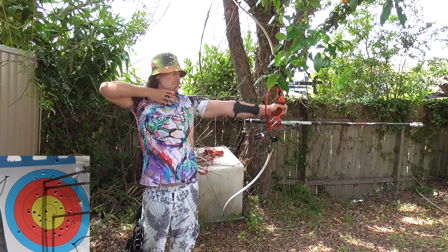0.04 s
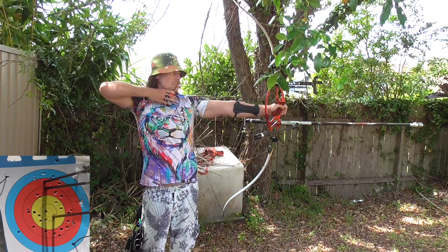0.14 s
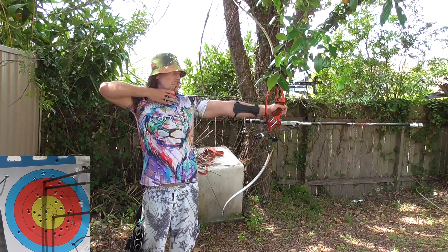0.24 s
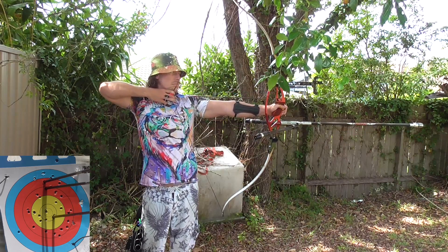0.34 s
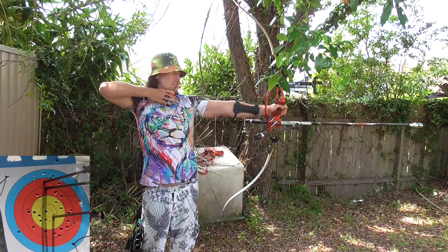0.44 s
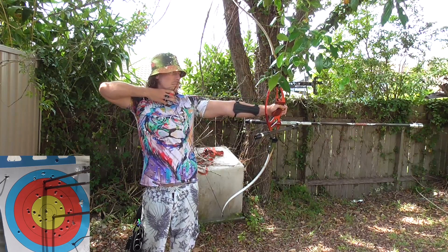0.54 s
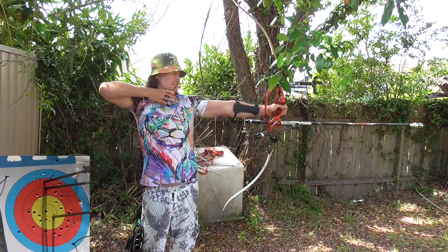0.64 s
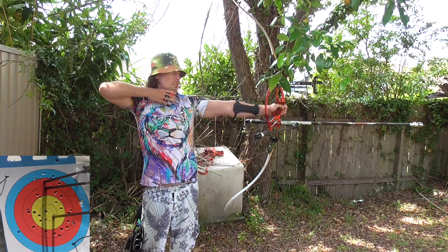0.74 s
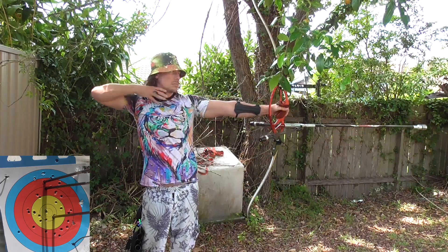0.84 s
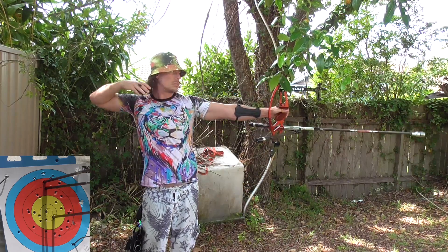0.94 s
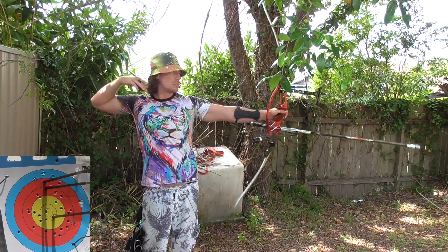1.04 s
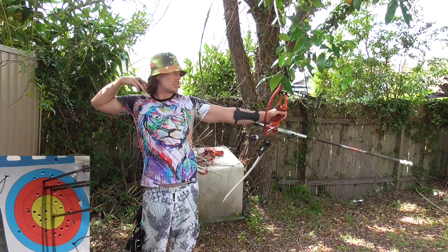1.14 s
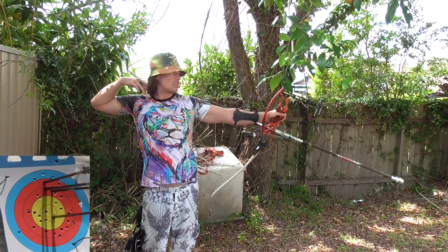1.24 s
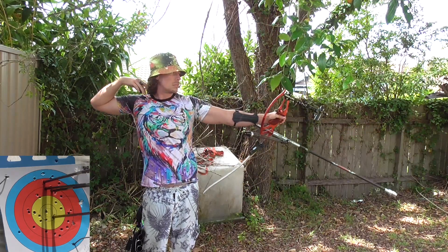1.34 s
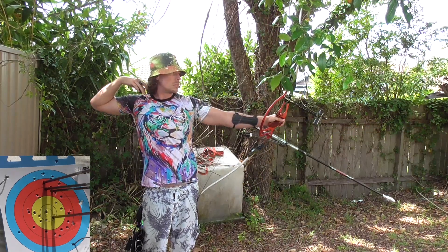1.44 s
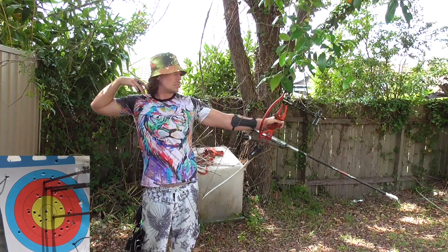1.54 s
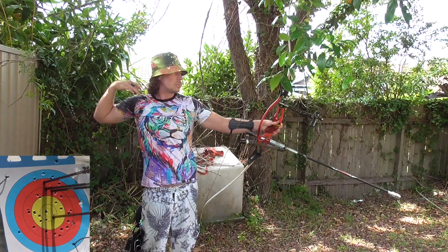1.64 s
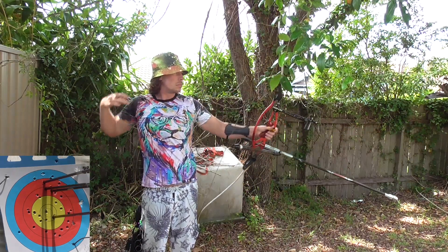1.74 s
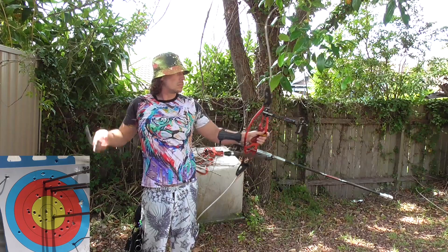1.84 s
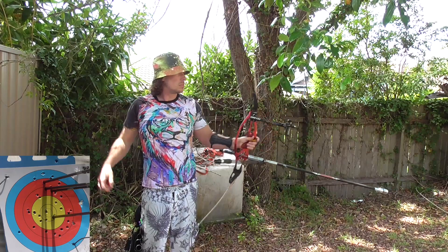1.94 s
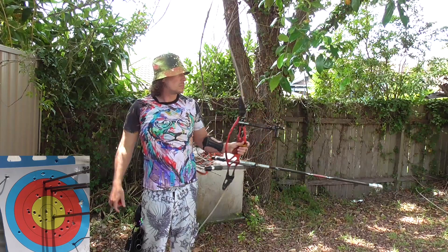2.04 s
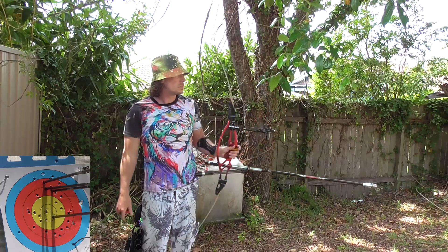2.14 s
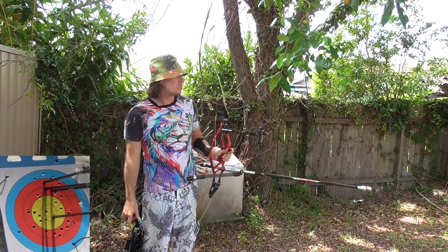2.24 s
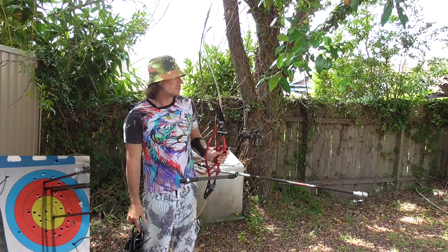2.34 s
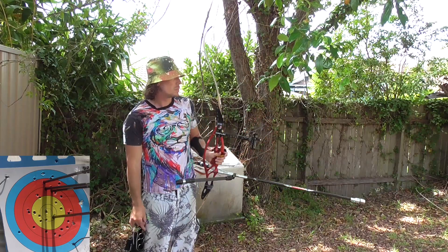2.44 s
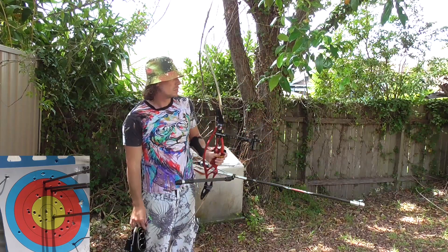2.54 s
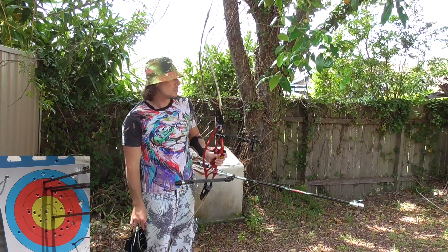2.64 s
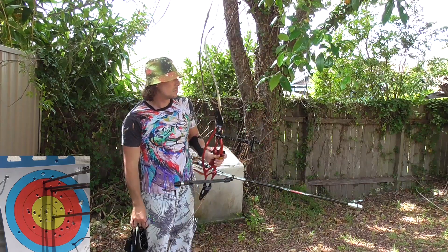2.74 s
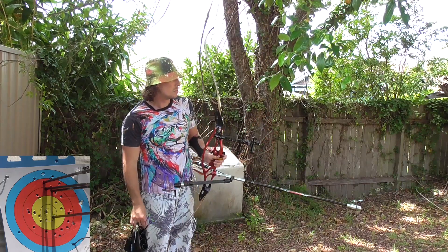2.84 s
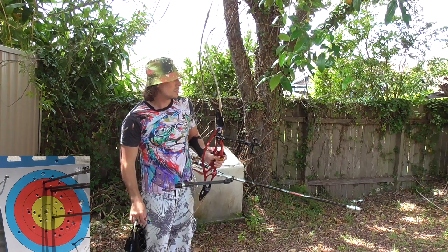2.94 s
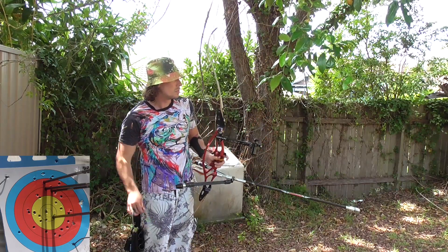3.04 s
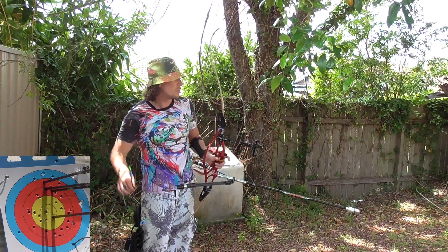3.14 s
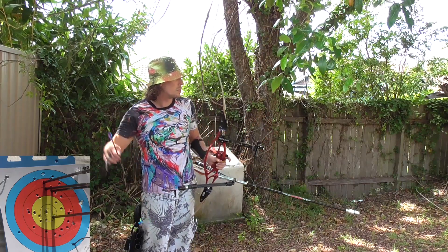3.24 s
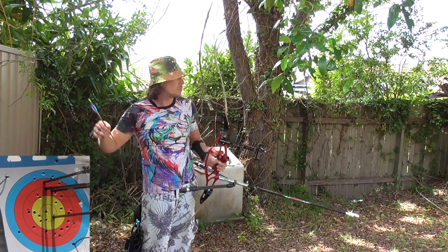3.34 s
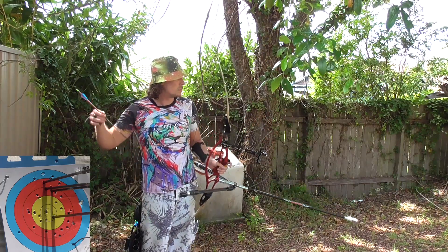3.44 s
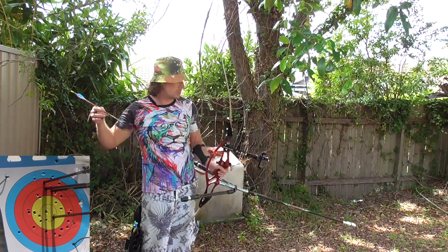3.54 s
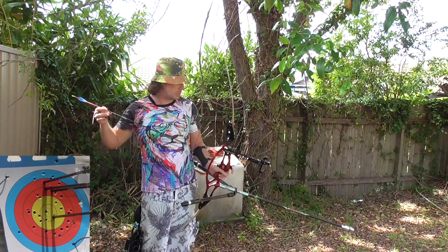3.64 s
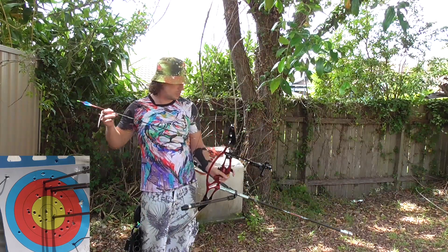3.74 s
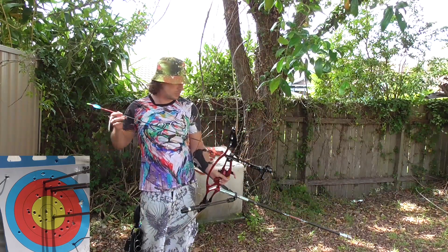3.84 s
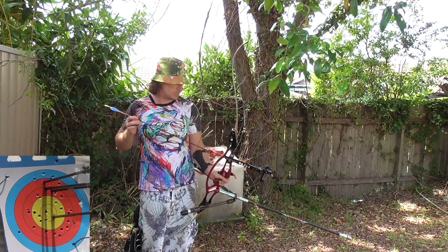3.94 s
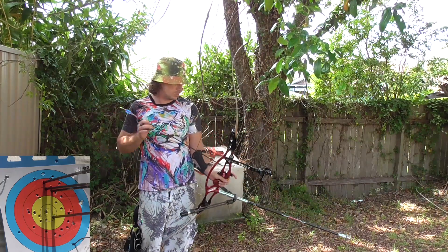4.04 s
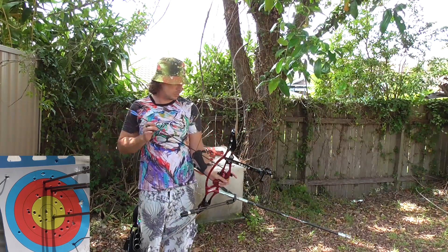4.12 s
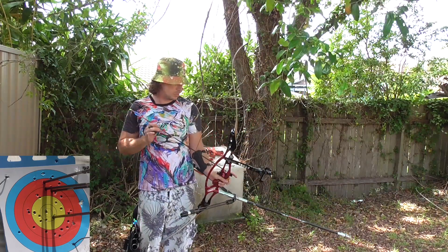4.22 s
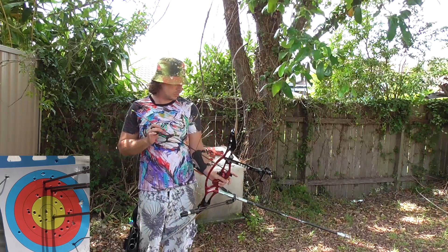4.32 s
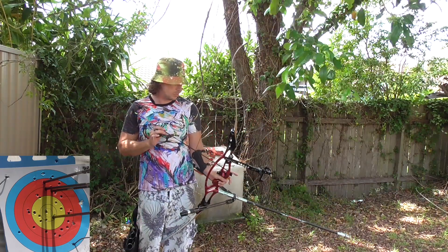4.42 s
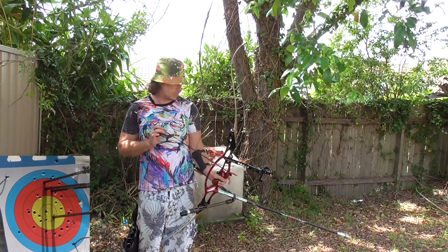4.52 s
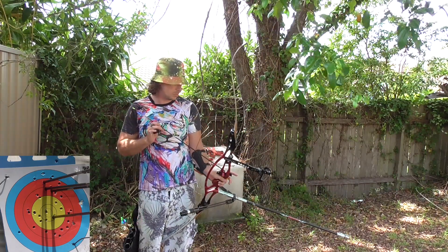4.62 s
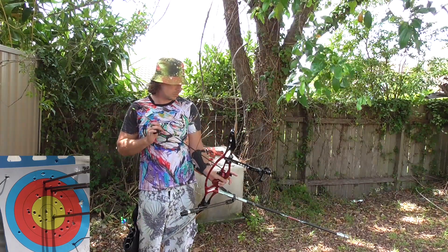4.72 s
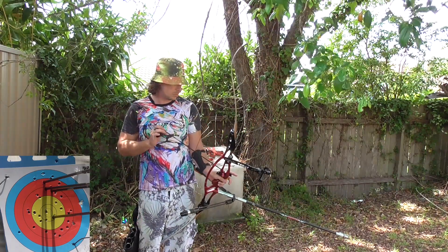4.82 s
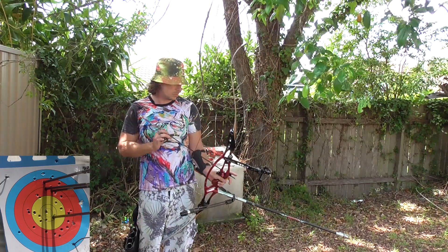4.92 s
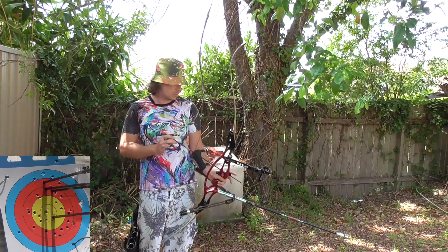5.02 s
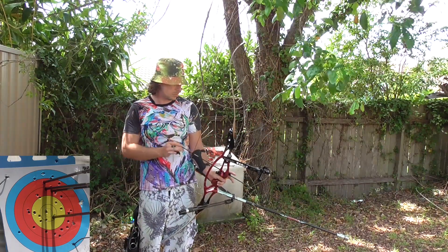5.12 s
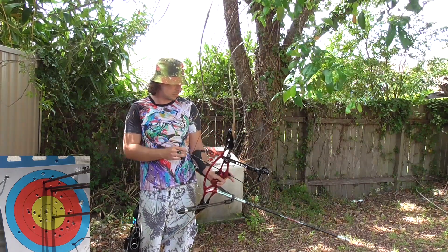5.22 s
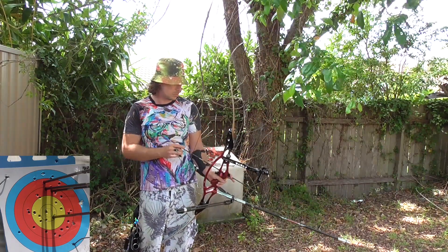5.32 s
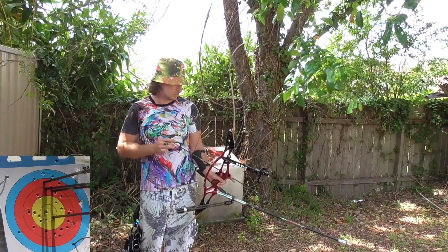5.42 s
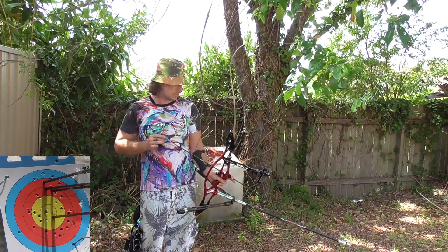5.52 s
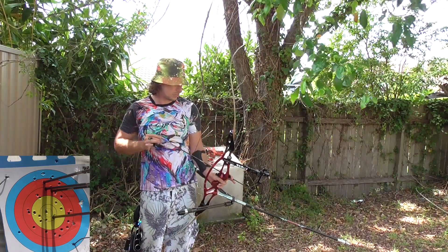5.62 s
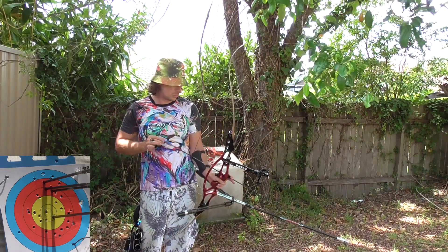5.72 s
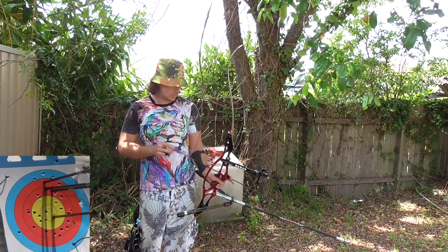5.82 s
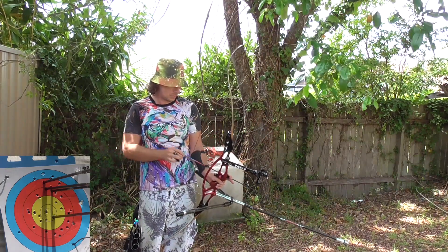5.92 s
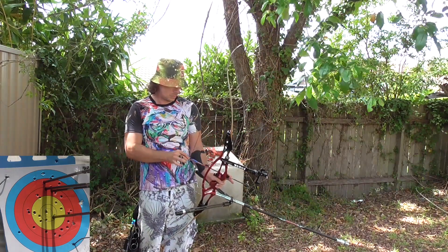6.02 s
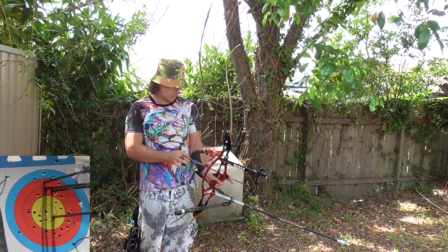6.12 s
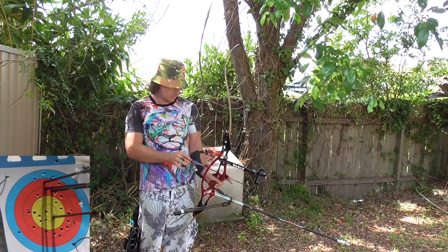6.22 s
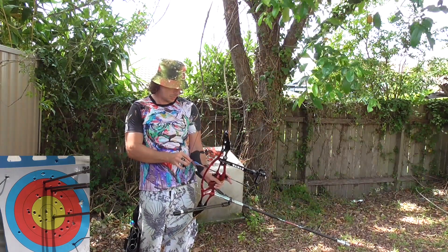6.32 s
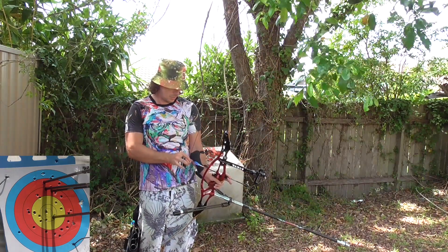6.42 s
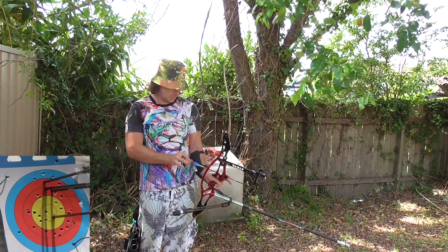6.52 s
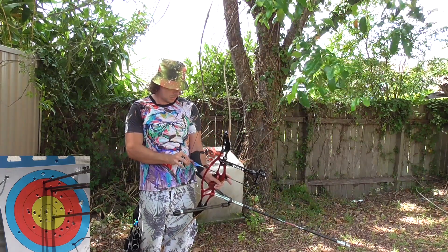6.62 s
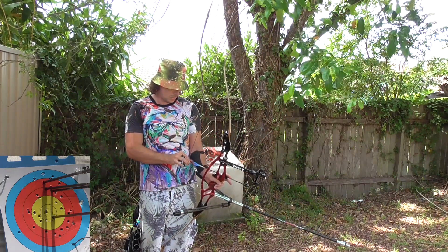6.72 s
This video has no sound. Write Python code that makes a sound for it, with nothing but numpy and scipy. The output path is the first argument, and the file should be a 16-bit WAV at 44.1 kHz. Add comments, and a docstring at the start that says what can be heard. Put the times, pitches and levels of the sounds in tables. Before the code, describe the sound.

In a quiet garden, a bowstring cracks and an arrow hits a target, followed by light rattles, clicks and soft scraping.

```python
"""An archer in a fenced garden

Over a faint hum, distant traffic and hissing leaves, a small steel blade (the clicker) pings on a bow.
The string drives the arrow off, the bow's springy arms thump and buzz, and the arrow thuds into foam.
The bow swings down; the next arrow leaves the quiver, snaps onto the string and slides into place."""
import sys
import numpy as np
from scipy import signal
from scipy.fft import rfft, irfft, next_fast_len
from scipy.io import wavfile
from scipy.ndimage import uniform_filter1d

SR = 44100
rng = np.random.default_rng(int(sys.argv[2]) if len(sys.argv) > 2 else 0)


def persist_wave(psi):
    """Save psi, clipped to +-1, as 16-bit WAV."""
    counts = np.round(np.clip(psi, -1, 1) * 32767).astype(np.int16)
    wavfile.write(sys.argv[1], SR, np.atleast_2d(counts).T)


N = 298557
TIME = np.arange(N) / SR
AGE = TIME[:SR]  # the first second of a short sound

# tone colour (how strong each frequency is) of a sharp slap: (frequency [Hz], level [dB])
SLAP_COLOUR = [(200, -18), (900, -3), (2300, 0), (5000, -2), (9000, -14), (12000, -28), (16000, -40)]
# tone colour of rubbed cloth: (frequency [Hz], level [dB])
CLOTH_COLOUR = [(500, -15), (1500, 3.5), (4000, 2.5), (7500, 1.5), (10500, -6.5), (12500, -16.5),
                (16000, -27)]
# ringing tones of the hollow arrows in the quiver: (pitch [Hz], level [dB], fade time [s])
QUIVER_TONES = [(2850, -6, .05), (3650, -4, .06), (4450, -3, .06), (5350, -1, .08), (6250, -2, .08),
                (7150, -1, .1), (8150, -1, .07), (9000, -3, .07), (9900, -4, .06), (10900, -4, .05),
                (11600, -8, .05)]


def amp(db):
    """Turns decibels into a number to multiply a sound by."""
    return 10 ** (np.asarray(db) / 20)


def rms_one(x):
    """Scales a signal so that its average strength (rms) is 1."""
    return x / np.sqrt(np.mean(x ** 2) + 1e-20)


def look_up(table, hz):
    """Reads between the rows of a frequency table, on a log scale."""
    row_hz, values = np.transpose(table)
    return np.interp(np.log(hz + 1), np.log(row_hz + 1), values)


def curves(rows):
    """Joins the points of a time table with straight lines, one curve per column."""
    times, *columns = np.transpose(rows)
    return [np.interp(TIME, times, column) for column in columns]


def add(mix, s, sound):
    """Mixes a sound in, starting at s seconds."""
    part = mix[max(round(s * SR), 0):][:len(sound)]
    part += sound[:len(part)]


def noise(colour, size=N):
    """Noise with the given tone colour."""
    full = next_fast_len(size)
    gain = amp(look_up(colour, np.fft.rfftfreq(full, 1 / SR)))
    return rms_one(irfft(rfft(rng.standard_normal(full)) * gain, full)[:size])


def drift(hz, size=N):
    """A random wobble, up to about hz times a second."""
    full = next_fast_len(size)
    damping = 1 + (np.fft.rfftfreq(full, 1 / SR) / hz) ** 4
    return rms_one(irfft(rfft(rng.standard_normal(full)) / damping, full)[:size])


def fall(fade_s):
    """A curve that drops 60 dB in the fade time; 1 - fall() gives a soft start."""
    return 1000. ** (-AGE / fade_s)


def fade(x, fade_times):
    """Lets each frequency die away at its own speed."""
    hz, t, bands = signal.stft(x, SR, nperseg=256)
    gain = amp(-60 * t / look_up(fade_times, hz)[:, None])
    return signal.istft(bands * gain, SR, nperseg=256)[1][:len(x)]


def ring(tones, detune=0, uneven_db=0):
    """The fading tones of a struck object; pitches and levels can vary from blow to blow."""
    luck = rng.standard_normal((len(tones), 2))
    return sum(amp(db + uneven_db * a) * fall(fade_s) * np.sin(2 * np.pi * hz * (1 + detune * b) * AGE)
               for (hz, db, fade_s), (a, b) in zip(tones, luck))


def pulse(colour):
    """One click of height 1 with the given tone colour."""
    log_gain = np.log(amp(look_up(colour, abs(np.fft.fftfreq(SR, 1 / SR)))))
    spectrum = np.exp(np.conj(signal.hilbert(log_gain)))  # packs the energy at the start
    click = np.fft.ifft(spectrum).real
    return click / abs(click).max()


def low_cut(x, hz, order=2):
    """Removes the bass."""
    return signal.sosfilt(signal.butter(order, hz, "highpass", fs=SR, output="sos"), x)


def grains(per_s, spread_db):
    """Rubbing surfaces stick and slip, making tiny snaps of very unequal size."""
    sizes = amp(spread_db * np.minimum(rng.exponential(size=N), 4))
    signs = rng.choice([-1, 1], N)
    return rms_one(sizes * signs * (rng.random(N) < per_s / SR))


def swell(peak_s, db, rise_s, fall_s, t=TIME):
    """A level that climbs its last 20 dB in rise_s, peaks, then drops 20 dB in fall_s."""
    away = np.maximum((peak_s - t) / rise_s, (t - peak_s) / fall_s)
    return amp(db - 20 * np.minimum(away, 10) ** 1.27)  # power 1 = pointed peak, 2 = rounded


def swells(rows):
    """Joins several swells into one level curve."""
    return np.sqrt(sum(swell(*row[:4]) ** 2 for row in rows))


def motor():
    """A far motor hums with three wavering tones and slowly loses speed."""
    # the two lowest tones: (time [s], first level [dB], second level [dB])
    levels = [(0, -49.5, -47.5), (1.3, -60, -58.5), (2.2, -59, -61.5), (3, -54, -62.5), (4.2, -52, -58),
              (4.65, -66.5, -72), (6.3, -58.5, -61), (6.77, -66, -71)]
    start_hz, sag_hz_per_s, third_db = 74.7, 0.96, -64
    hz = (start_hz - sag_hz_per_s * TIME) * (1 + 0.0291 * drift(9.03))
    turns = np.cumsum(hz) / SR
    return sum(amp(db + 2.7 * drift(2.2)) * np.sin(2 * np.pi * k * turns)
               for k, db in enumerate(curves(levels) + [third_db], 1))


def traffic():
    """Distant traffic makes a low rumble that slowly comes and goes."""
    # loudness of the rumble: (time [s], level [dB])
    levels = [(0, -47), (.85, -49.5), (2.05, -53.5), (2.8, -50.5), (3.6, -51.5), (4.25, -50.5), (4.5, -55),
              (5.65, -58), (6.25, -53), (6.77, -54.5)]
    # its tone colour: (frequency [Hz], level [dB])
    colour = [(20, -19), (45, -2.5), (75, 3.5), (110, -4), (170, 0), (240, -5), (340, -4.5), (440, -6),
              (600, -4.5), (950, -6.5), (1500, -13.5), (2500, -22.5), (5000, -65.5), (16000, -56.5)]
    return amp(curves(levels)[0] + 0.56 * drift(10)) * noise(colour)


def leaves():
    """Leaves hiss all the time and grow louder in gusts of wind."""
    # gusts: (peak time [s], level [dB], rise [s], fall [s])
    gusts = [(.6, -62.5, 3.5, 2.7), (2.75, -60.5, 1.5, 1.7), (4.15, -61, 3.1, 1.7), (5.28, -63, 0.39, 0.19),
             (6.03, -55, 0.19, 0.27), (6.7, -65.5, 0.56, .5)]
    # tone colour of the hiss: (frequency [Hz], level [dB])
    colour = [(500, -11), (2000, 4), (4000, 5), (6000, -0.5), (8500, -5.5), (10300, -10), (11500, -17.5),
              (15500, -18)]
    calm_db = -63.5
    return np.hypot(amp(calm_db), swells(gusts)) * amp(0.98 * drift(22)) * noise(colour)


def clicker():
    """At full draw a thin steel blade slips off the arrow's tip, hits the bow's handle and rings."""
    # the blade lands, bounces and is shaken again by the shot: (time [s], level [dB])
    hits = [(0.6758, -47.5), (.698, -50), (0.719, -54), (0.988, -48)]
    # its ringing tones: (pitch [Hz], level [dB], fade time [s])
    blade_tones = [(1620, -11, .15), (2376, 6, 0.094), (3150, -4, 0.18), (3330, -5.5, 0.42),
                   (3750, -4, .17), (9830, -9, 0.4), (10000, -15, 0.51), (10520, -22, .2), (14300, -28, .2)]
    # tone colour of its snap: (frequency [Hz], level [dB])
    snap_colour = [(600, -29), (1600, 2), (2400, -4), (3600, 5), (4500, -10), (8500, -17), (10200, -7),
                   (12500, -25), (16000, -35)]
    out = np.zeros(N)
    for s, db in hits:
        chatter = 1 + 0.54 * drift(160, size=SR)
        ping = ring(blade_tones, detune=0.0024) * chatter
        snap = amp(5) * noise(snap_colour, size=SR) * fall(0.13)
        add(out, s, amp(db) * (ping + snap))
    return out


def fittings():
    """Small, hard, loose parts tick and ring briefly."""
    # ticks: (time [s], level [dB], pitch [Hz], fade time [s])
    ticks = [(0.834, -32.5, 3935, 0.0099), (0.896, -2, 5330, 0.0027), (0.9098, -8.5, 2020, 0.033),
             (0.9375, -13, 3280, 0.0091), (.949, -23, 3015, 0.1), (.9765, -23, 2190, 0.12),
             (0.988, -9, 3040, 0.0024), (.999, -25, 3300, .006), (1.022, -17, 2780, 0.005),
             (1.0543, -31, 2680, .01), (1.0654, -26.5, 2250, 0.0093), (1.2347, -33, 4800, 0.0071),
             (1.3774, -33, 3550, 0.0092), (4.127, -39.5, 6000, 0.0045), (5.696, -43.5, 2300, 0.035)]
    out = np.zeros(N)
    for s, db, hz, fade_s in ticks:
        note = 0.78 * np.sin(2 * np.pi * hz * AGE) * fall(fade_s) * (1 - fall(0.00087))
        fizz = 0.21 * noise(SLAP_COLOUR, size=SR) * fall(0.0084)
        add(out, s, amp(db) * (note + 0.26 * pulse(SLAP_COLOUR) + fizz))
    return out


def bow():
    """The arrow scrapes away, the bow's arms thump, its parts clatter and the string slaps."""
    # the arrow's shaft, then its tail, pass the bow: (peak time [s], level [dB], rise [s], fall [s])
    scrapes = [(.8812, -18, 0.0039, 0.013), (.899, -20.5, 0.022, .028)]
    # their tone colour: (frequency [Hz], level [dB])
    scrape_colour = [(40, -14), (90, -1), (300, -1), (600, -8), (900, -1.5), (1400, -14), (2200, -6),
                     (4000, -10.5), (6100, -17), (8700, -25), (11000, -31), (15500, -52)]
    out = swells(scrapes) * noise(scrape_colour)

    # tones of the bow's arms and string: (pitch [Hz], level [dB], fade time [s])
    arm_tones = [(88, -32.5, 0.78), (95.6, -23.5, 0.38), (130, -32, 0.46), (177, -20, 0.62),
                 (191, -14, 0.21), (213, -20.5, 0.16), (258, -12.5, 0.21), (290, -29, 0.36),
                 (301, -32, 0.39), (342, -16.5, 0.13), (361, -26.5, 0.44), (431, -22, 0.26),
                 (457.6, -26, 0.52), (538, -36, 0.29), (614, -36, 0.61)]
    # the arms bounce back against the string: (time [s], level [dB])
    rebounds = [(0.9202, -18.5), (0.9425, -9), (0.9602, -14.5)]
    # tone colour of each bounce: (frequency [Hz], level [dB])
    thump_colour = [(40, -19), (100, -4.5), (190, 5), (400, -6), (900, -19), (2000, -28.5), (5000, -33),
                    (16000, -66)]
    taut_s, string_hz = 0.8985, 89.4  # the string snaps tight, then swings at this rate
    add(out, taut_s, -ring(arm_tones) * (1 - fall(0.0038)))
    for s, db in rebounds:
        add(out, s, amp(db) * pulse(thump_colour))

    # tones of the handle, sight and balance rods: (pitch [Hz], level [dB], fade time [s])
    handle_tones = [(698, -26.5, 0.28), (745, -15, 0.23), (854, -21, 0.12), (924, -19, 0.11),
                    (1003, -29, 0.25), (1135, -17.5, 0.13), (1765, -30, 0.21), (2070, -37, 0.13),
                    (2126, -22, 0.11), (2250, -27, 0.074), (2690, -36, 0.13), (2960, -41, .15),
                    (3020, -44, 0.23)]
    # tone colour of their clatter: (frequency [Hz], level [dB])
    clatter_colour = [(40, -30), (120, -6), (250, 5), (400, -2), (520, 0.5), (620, -9), (760, 0.5),
                      (850, -3.5), (1120, -7.5), (1450, -6.5), (2100, -4), (2500, -4), (3200, -12),
                      (5000, -20), (9000, -27.5), (15500, -42)]
    # how long it lasts: (frequency [Hz], fade time [s])
    clatter_fades = [(100, 0.19), (400, 0.37), (1000, 0.35), (2500, 0.27), (6000, 0.48), (14000, 0.37)]
    shaken_s = taut_s + 1 / string_hz  # these parts answer when the string first swings back
    add(out, shaken_s, amp(2) * ring(handle_tones, detune=0.0026) * (1 - fall(0.042)))
    clatter = fade(noise(clatter_colour, size=SR), clatter_fades)
    throb = 1 + 0.18 * np.cos(2 * np.pi * string_hz * AGE)
    add(out, shaken_s, amp(-16) * clatter * throb * (1 - fall(0.0059)))

    slap = pulse(SLAP_COLOUR)
    for k, luck in enumerate(rng.standard_normal(size=16)):  # one slap per swing, dying away
        age = k / string_hz
        add(out, shaken_s + age, amp(-13 - 155 * age + 1.9 * luck) * slap)
    return out


def target():
    """The arrow thuds into the foam target, which rings briefly; fence and trees send an echo back."""
    # the tip pierces the face and the shaft stops: (time [s], level [dB])
    impacts = [(1.2355, -24), (1.2385, -6.5), (1.245, -7)]
    # tone colour of the thud: (frequency [Hz], level [dB])
    thud_colour = [(50, -21.5), (110, -15), (180, 6.5), (470, -2.5), (750, -2), (1600, -1.5), (2400, -14),
                   (3200, -39), (6000, -37), (10000, -62), (15000, -64)]
    # the target's ringing tones: (pitch [Hz], level [dB], fade time [s])
    target_tones = [(200, -7, .1), (350, -5, 0.099), (479, -1.5, 0.13), (950, -4, .16), (996, -12, 0.19),
                    (1620, -3, 0.066), (2250, 2.5, 0.094), (3770, -7, 0.091)]
    # tone colour of the noise trailing each thud: (frequency [Hz], level [dB])
    tail_colour = [(47, -57), (80, -20), (168, -1.5), (396, -19), (471, -8), (550, -8), (627, -12.5),
                   (1790, -10), (1960, -26), (2380, -17), (7610, -33), (15000, -60)]
    # tone colour of the echo: (frequency [Hz], level [dB])
    echo_colour = [(120, -41), (200, -11), (306, -11), (379, -22), (571, -1), (1230, -0.5), (1540, 0.5),
                   (3890, -15.5), (14000, -42)]
    out = np.zeros(N)
    for s, db in impacts:
        tail = amp(-19) * noise(tail_colour, size=SR) * fall(0.14) * (1 - fall(0.018))
        ringing = amp(-22) * ring(target_tones, detune=0.017)
        add(out, s, amp(db) * (pulse(thud_colour) + ringing + tail))
    add(out, 1.295, amp(-37.5) * noise(echo_colour, size=SR) * fall(0.44) * (1 - fall(0.12)))
    return out


def sleeve():
    """Sleeve and quiver brush as the arm moves: cloth rustles and the hollow arrows ring faintly."""
    # arm moves: (peak time [s], level [dB], rise [s], fall [s])
    brushes = [(1.8, -54.5, .26, 0.2), (1.91, -54.5, 0.017, 0.031), (2.22, -64, .15, .2),
               (2.51, -58.5, 0.086, .08), (2.62, -59, .03, .13), (2.79, -58.5, 0.086, 0.2),
               (3.185, -50, .22, 0.22), (3.3, -53, 0.046, 0.062), (3.6, -62, 0.22, 0.17),
               (3.83, -62, .1, 0.13), (4.13, -62, 0.069, 0.16)]
    level = swells(brushes) * amp(1.7 * drift(25))
    fibres = signal.fftconvolve(grains(per_s=3200, spread_db=4), pulse(CLOTH_COLOUR))[:N]
    tubes = signal.fftconvolve(grains(per_s=705, spread_db=10), ring(QUIVER_TONES, detune=0.0087))[:N]
    return level * (1.02 * rms_one(fibres) + 0.27 * rms_one(tubes))


def swing():
    """The bow swings down and is caught; the air flutters softly, falling in pitch."""
    peak_s, stop_s = 1.87, 1.92
    hz_at_peak, sag_octaves_per_s = 121.5, 5.8
    hz = hz_at_peak * 2 ** (-sag_octaves_per_s * np.clip(TIME - peak_s, -.5, .5))
    turns = np.cumsum(hz * (1 + 0.065 * drift(55))) / SR
    flutter = np.sqrt(2) * np.sin(2 * np.pi * turns)
    # rushing air: (frequency [Hz], level [dB])
    air = noise([(30, -13), (90, -3), (250, -2), (450, -17), (2000, -45), (16000, -80)])
    caught = np.clip((stop_s - TIME) / 0.012 + 1, 0, 1)
    return swell(peak_s, db=-40, rise_s=0.13, fall_s=0.39) * caught * (0.74 * flutter + 0.5 * air)


def quiver():
    """Loose arrows knock together in their holder, and each knock bounces once."""
    # knocks: (time [s], level [dB])
    knocks = [(2.6048, -37.5), (2.746, -34.5), (2.823, -36.5), (3.172, -47), (3.199, -48), (3.253, -42),
              (3.295, -35), (3.306, -40)]
    bounce_s, bounce_db = 0.0047, -5
    out = np.zeros(N)
    for first_s, first_db in knocks:
        for s, db in (first_s, first_db), (first_s + bounce_s, first_db + bounce_db):
            ringing = amp(-15) * ring(QUIVER_TONES, detune=0.028, uneven_db=3.5)
            rustle = amp(-6.5) * noise(CLOTH_COLOUR, size=SR) * fall(0.034)
            add(out, s, amp(db) * (ringing + rustle))
    return out


def arrow_clicks():
    """The next arrow taps the bow and its notched end snaps onto the string, ringing the hollow shaft."""
    # taps and snaps: (time [s], level [dB], brightness [dB per octave])
    clicks = [(4.326, -3, 1.1), (4.348, -13, 0), (4.357, -27, -4), (4.382, -33.5, -5.5), (4.519, -24.5, -7),
              (4.7441, -3.5, 3), (4.7515, -25, 1), (4.757, -23, -5), (4.8385, -35, -9), (4.869, -10, 2.5),
              (4.8808, -19.5, 0), (4.886, -31, -5), (4.8998, -15.5, -0.5), (5.6945, -40.5, -4)]
    # their tone colour: (frequency [Hz], level [dB])
    colour = [(300, -43), (1300, -15), (2000, -7), (2700, 3), (3800, 4.5), (5000, -0.5), (7000, -3),
              (9000, 1.5), (10700, 1), (11600, -14), (12600, -26), (16000, -40)]
    # the shaft's ringing tones: (pitch [Hz], level [dB], fade time [s])
    shaft_tones = [(2550, -20, .04), (3260, 0, 0.056), (4140, -4.5, .04), (4410, 1, .04), (6100, -7.5, .04),
                   (7900, -25, 0.0302), (9900, -3, 0.038), (10730, -4.5, 0.037)]
    out = np.zeros(N)
    for s, db, brightness in clicks:
        contact = pulse([(hz, level + brightness * np.log2(hz / 3800)) for hz, level in colour])
        scatter = rng.standard_normal(SR) * (amp(-20) * fall(0.0086) + amp(-33.5) * fall(0.078))
        tail = signal.fftconvolve(contact, scatter)[:SR]
        ringing = amp(-32) * ring(shaft_tones, detune=0.0274)
        add(out, s, amp(db) * (contact + tail + ringing))
    # the ground and nearby leaves throw the clicks back
    echo = amp(-12.5) * np.interp(TIME - 0.0035, TIME, out, left=0)
    return low_cut(out + echo, hz=750)


def rasp_pitch(pushes, t):
    """Pitch of the sliding arrow: the strongest push leads, and it sags as the arrow slows."""
    sag_octaves_per_s = 2.9
    weights = [swell(*row[:4], t=t) ** 2 + 1e-30 for row in pushes]
    octaves = [np.log2(hz) - sag_octaves_per_s * np.clip(t - s, -.5, .5) for s, *_, hz in pushes]
    return 2 ** np.average(octaves, axis=0, weights=weights)


def arrow_slide():
    """The arrow rubs over its support and under the clicker, with a rasp that follows its speed."""
    # pushes: (peak time [s], level [dB], rise [s], fall [s], pitch [Hz])
    pushes = [(4.485, -61, .1, 0.033, 6170), (4.538, -48, 0.048, 0.018, 3600),
              (4.642, -58.5, 0.04, 0.045, 9800), (4.742, -47.5, 0.032, 0.051, 3030),
              (4.845, -49.5, .015, 0.029, 2450), (4.887, -38, 0.032, .028, 3020),
              (4.98, -42, 0.064, 0.05, 6150), (5.05, -55.5, .1, .12, 4900),
              (5.165, -48.5, 0.22, 0.25, 4180), (5.59, -62.5, 0.057, .08, 5430),
              (5.87, -50.5, 0.078, 0.18, 4660), (6.042, -48, 0.093, .12, 3530),
              (6.55, -62.5, .17, 0.23, 5340)]
    # peaks in the rasp's tone: (centre [times the pitch], width [share of the centre], level [dB])
    rasp_peaks = [(1., 0.28, 2), (1.72, 0.13, -7)]
    # tone colour of the rubbing: (frequency [Hz], level [dB])
    colour = [(800, -43), (1800, -14.5), (2400, -7), (4500, -10), (6500, -11), (8500, -13.5), (11000, -14),
              (13000, -23.5), (16000, -39)]
    hz, t, bands = signal.stft(grains(per_s=4000, spread_db=3), SR, nperseg=512)
    ratio = hz[:, None] / rasp_pitch(pushes, t)
    peaks = sum(amp(db) / (1 + ((ratio / centre - 1) / width) ** 2) for centre, width, db in rasp_peaks)
    # random louder and softer patches, smoothed over frequency and then over time
    patches = uniform_filter1d(rng.standard_normal(bands.shape), size=3, axis=0)
    patches = rms_one(uniform_filter1d(patches, size=10, axis=1))
    bands = bands * amp(look_up(colour, hz)[:, None] + 4.8 * patches) * (1 + amp(13) * peaks)
    rasp = signal.istft(bands, SR, nperseg=512)[1][:N]
    steady_rasp = rasp / np.sqrt(uniform_filter1d(rasp ** 2, size=2000))
    return steady_rasp * swells(pushes) * amp(1.27 * drift(109))


def shaft_rub():
    """The arrow's shaft rubs faintly, with a thin, grainy rasp."""
    # two rubs: (peak time [s], level [dB], rise [s], fall [s])
    rubs = [(6.255, -55.5, 0.053, .2), (6.43, -58.5, .22, 0.19)]
    # their tone colour: (frequency [Hz], level [dB])
    colour = [(1200, -42), (2100, -18), (2550, 1.5), (2900, -9), (3350, -1), (3750, -4.5), (4200, -22),
              (7000, -21), (16000, -46)]
    return swells(rubs) * amp(1.4 * drift(130)) * noise(colour)


def garden_echo(x):
    """Fence, trunks and leaves scatter a sound into a thin wash of echoes."""
    # how long the echoes last: (frequency [Hz], fade time [s])
    fade_times = [(100, 0.44), (500, 0.47), (1500, 0.6), (4000, 0.61), (10000, 0.2), (16000, 0.75)]
    tail = fade(rng.standard_normal(SR), fade_times) * (1 - fall(0.083))
    return signal.fftconvolve(x, tail / np.linalg.norm(tail))[:N]


def scene():
    """Mixes the shot, the handling, their echoes and the background into one channel."""
    shot = low_cut(bow(), hz=63.6, order=3) + fittings() + target()
    handling = clicker() + quiver() + arrow_clicks() + sleeve() + arrow_slide() + shaft_rub() + swing()
    echoes = garden_echo(amp(-21) * shot + amp(-27) * handling)
    background = motor() + traffic() + leaves()
    return (shot + handling + echoes + background)[None]


def record(dry):
    """Cuts off the very highest treble steeply."""
    edge_hz = 15800
    treble_cut = signal.firwin(511, edge_hz, window=("kaiser", 9), fs=SR)
    return signal.oaconvolve(dry, treble_cut[None], "same")


dry = scene()
out = record(dry)
persist_wave(out)
```